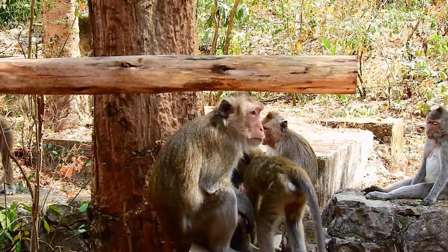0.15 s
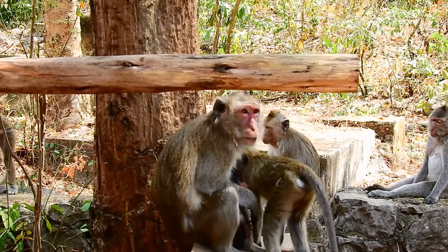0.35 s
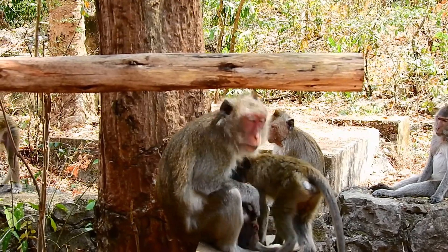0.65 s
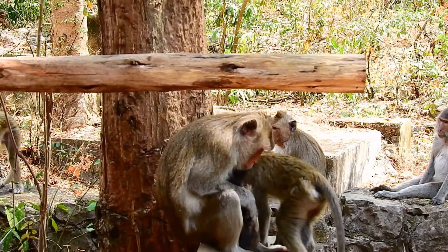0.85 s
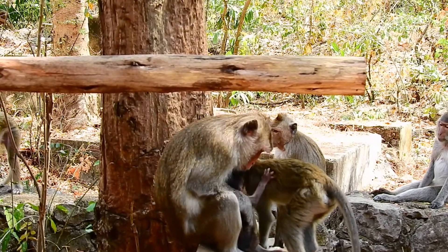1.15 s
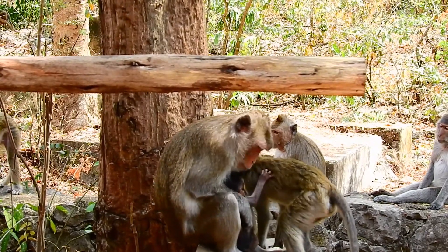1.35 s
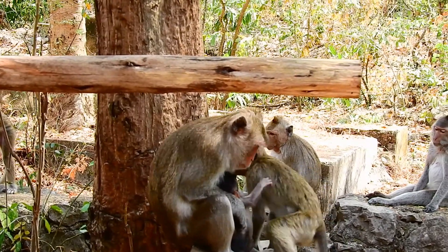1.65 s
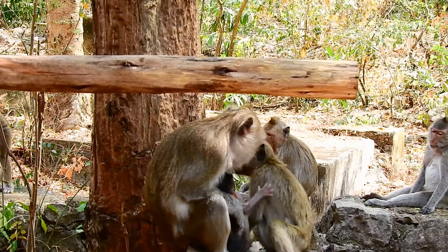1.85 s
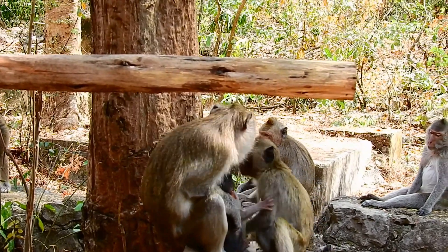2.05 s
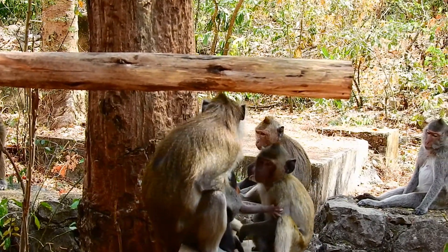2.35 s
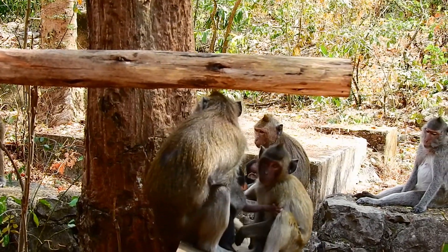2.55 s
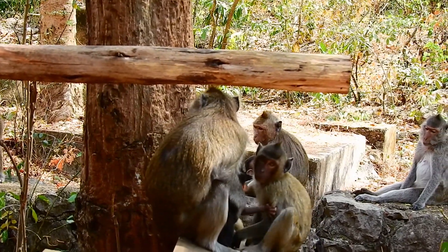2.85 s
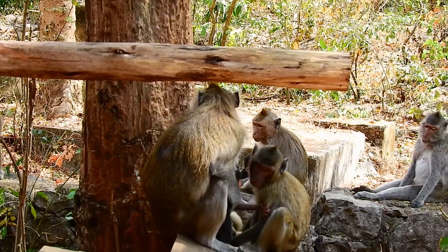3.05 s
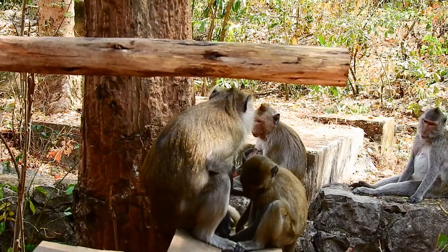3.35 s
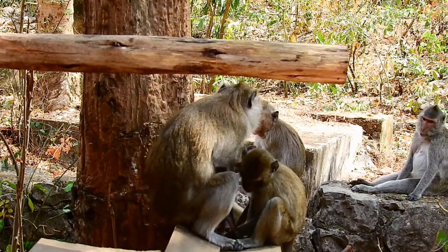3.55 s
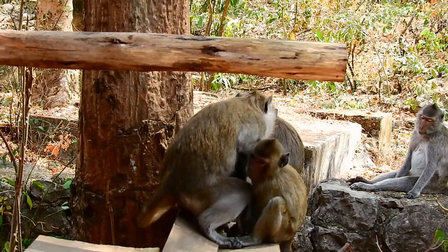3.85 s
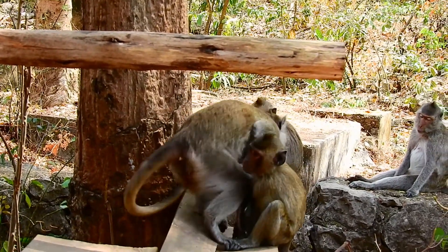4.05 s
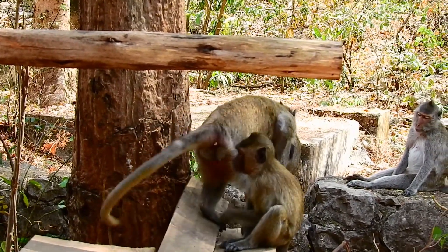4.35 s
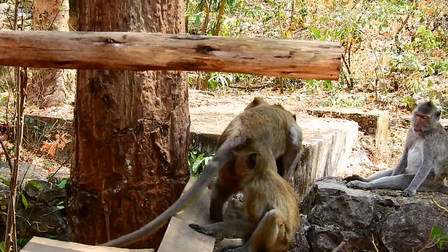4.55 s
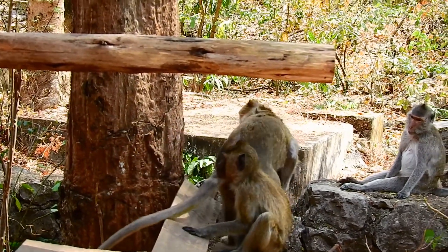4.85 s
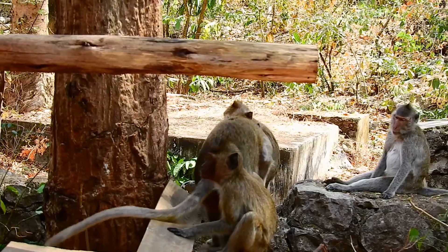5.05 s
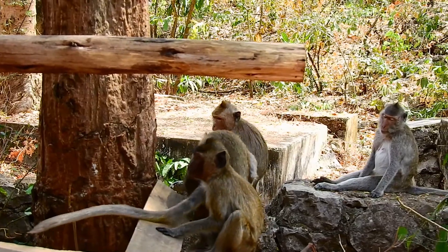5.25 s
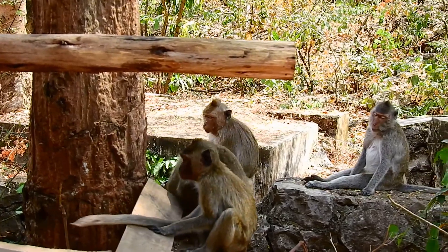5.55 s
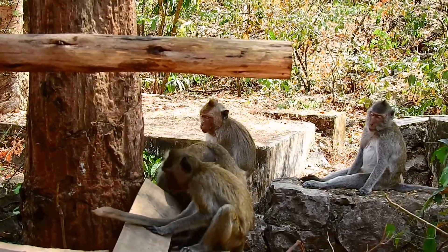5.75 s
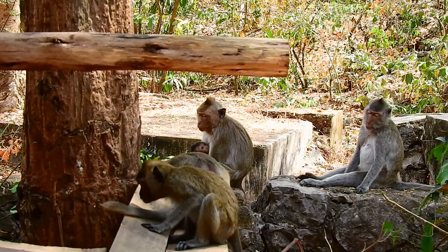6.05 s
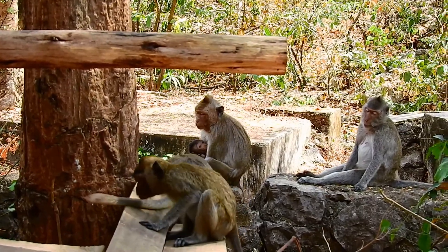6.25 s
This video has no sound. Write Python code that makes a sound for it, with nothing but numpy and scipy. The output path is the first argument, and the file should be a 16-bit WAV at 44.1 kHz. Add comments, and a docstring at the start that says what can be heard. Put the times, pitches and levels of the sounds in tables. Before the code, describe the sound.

Metal knocks and scrapes to the left, a small monkey squeals harshly again and again, then leaves crackle under soft footfalls outdoors.

```python
"""A sheet-metal object to the left is knocked, scraped and squeaks: sums of dying modes, rubbing noise, tones.
Over it and after it a young monkey squeals five times and chirps once among trees: two whistle-like
vibrations in its throat, with overtones and a sum tone, break into rasp made of shaped noise.
Later feet rustle dry leaves (random grains) and thud (short decaying tones).
Behind it all lie a far insect hiss and a low rumble of air, both coloured noise."""
import sys
import numpy as np
from scipy import signal
from scipy.fft import rfft, irfft
from scipy.io import wavfile
from scipy.ndimage import uniform_filter1d

SR = 44100
rng = np.random.default_rng(int(sys.argv[2]) if len(sys.argv) > 2 else 0)


def nominal_scale(level):
    """Amplitude ratio for a level in decibels (scalar or array-like)."""
    x = np.asarray(level, float) / 20
    return 10 ** x


def master_out(mix):
    """Clip the mix to full scale and print it as 16-bit PCM to the path in sys.argv[1]."""
    frames = np.transpose(np.atleast_2d(mix))
    ceiling = np.clip(frames, -1, 1)
    pcm = np.round(ceiling * 32767).astype(np.int16)
    wavfile.write(sys.argv[1], SR, pcm)


N = 281797  # length [samples]


def evened(x):
    """Normalization: scales to rms 1."""
    return x / np.sqrt(np.mean(x ** 2) + 1e-20)


def read(points, hz):
    """Interpolation of a table on a logarithmic frequency axis."""
    table_hz, value = np.transpose(points)
    return np.interp(np.log(hz + 1), np.log(table_hz + 1), value)


def coloured(x, spectrum):
    """Linear filtering: multiplies the sound's spectrum by a table (frequency [Hz], level [dB]); rms 1."""
    gain = nominal_scale(read(spectrum, np.fft.rfftfreq(len(x), 1 / SR)))
    return evened(irfft(rfft(x) * gain, len(x)))


def wobble(length, hz):
    """Low-pass random process of rms 1: noise through two equal poles at hz."""
    pole = np.exp(-2 * np.pi * hz / SR)
    return evened(signal.lfilter([1], np.convolve([1, -pole], [1, -pole]), rng.standard_normal(length)))


def played(rows):
    """Linear interpolation: start sample and the columns of a curve, sample by sample."""
    s, *columns = np.transpose(rows)
    t = np.arange(max(s[0], 0), s[-1], 1 / SR)
    return round(t[0] * SR), [np.interp(t, s, column) for column in columns]


def strokes(rows, rise_s, fall_db_per_s):
    """Exponential decay: strokes rise, hold and die away; their powers add. Start sample and gain."""
    s, hold, db = np.transpose(rows)[:, :, None]
    end = (s + hold).max() + rise_s + 40 / fall_db_per_s
    t = np.arange(max(s.min(), 0), end, 1 / SR)
    rise = np.clip((t - s) / rise_s, 0, 1)
    each = rise * nominal_scale(db - fall_db_per_s * np.maximum(t - s - rise_s - hold, 0))
    return round(t[0] * SR), np.sqrt((each ** 2).sum(0))


def add(mix, start, sound):
    """Superposition: adds a sound from a start sample on."""
    part = mix[..., start:start + sound.shape[-1]]
    part += sound[..., :part.shape[-1]]


def sided(x, side_db):
    """Level difference between the ears: left exceeds right by side_db."""
    return np.array([x * nominal_scale(side_db / 2), x * nominal_scale(-side_db / 2)])


def fold(hz, jitter, flutter_db):
    """Self-sustained vibration, unsteady in pitch and strength: phase [rad] and amplitude."""
    turns = np.cumsum(hz * (1 + jitter * wobble(len(hz), 490))) / SR
    return 2 * np.pi * turns, np.sqrt(2) * nominal_scale(flutter_db * wobble(len(hz), 112))


# throat resonances that band the rasp: (frequency [Hz], width [Hz], lift [dB])
THROAT = [(2850, 74, -1), (3200, 570, 10), (4690, 440, 4.5), (5360, 940, 4), (6040, 230, 4),
          (6900, 99, -44)]


def banded(x):
    """Resonance: the throat lifts or cuts bands of the rasp, and random streaks drift over it."""
    hz, _, z = signal.stft(x, SR, nperseg=512, noverlap=384)
    lift_db = sum(db / (1 + (2 * (hz - centre) / width) ** 2) for centre, width, db in THROAT)
    streaks = rng.standard_normal(z.T.shape).T
    streaks = uniform_filter1d(uniform_filter1d(streaks, 3, axis=0), 16, axis=1)
    z = z * nominal_scale(lift_db[:, None] + 3.5 * evened(streaks))
    return evened(signal.istft(z, nperseg=512, noverlap=384)[1][:len(x)])


# mean pitch of the lower vibration: (time [s], frequency [Hz])
LOWER_PITCH = [(0.259, 2985), (.95, 2750), (1.14, 3186), (1.301, 3126), (1.39, 2927), (1.9, 2850),
               (2.5, 2794), (3.12, 2820), (3.51, 2866), (3.6, 2605), (3.7, 2787), (3.745, 1962),
               (4.31, 2864), (4.66, 2784)]
# strength of an overtone against its fundamental: (frequency [Hz], level [dB])
MOUTH = [(5000, -8), (6800, -5), (7500, -9), (8300, -23), (10000, -30), (11500, -35), (13000, -55)]
# spectrum of the rasp before the throat resonances: (frequency [Hz], level [dB per Hz])
RASP = [(1500, -28.5), (2300, -17.5), (2650, -17.5), (3600, 2), (5000, 5), (6200, 1), (7800, -8),
        (9000, -15), (11000, -23.5), (13000, -65), (15500, -81)]


def squeal(rows):
    """Biphonation: two vibrations and their sum tone share the effort; tearing turns them into lumpy rasp."""
    start, (hz, effort_db, share, torn) = played(rows)
    length = len(hz)
    share, torn = np.clip([share, torn], 0, 1)
    waver = 0.014  # share of the pitch
    hz = hz * (1 + waver * wobble(length, 30))
    low_hz = np.interp((start + np.arange(length)) / SR, *np.transpose(LOWER_PITCH))
    low_hz = low_hz * (1 + waver * wobble(length, 40))
    # jitter is a share of the pitch; tearing adds to it, most where the lower vibration leads
    phase, size = fold(hz, 0.01 + 0.033 * torn ** 2, 2.5 + 1.5 * torn)
    low_phase, low_size = fold(low_hz, 0.008 + 0.03 * share * torn, 2.5 + 2.5 * torn)
    size = size * np.sqrt(1 - share ** 2)
    low_size = low_size * share
    overtones = sum(nominal_scale(read(MOUTH, k * hz)) * np.sin(k * phase) for k in (2, 3))
    upper = size * (np.sin(phase) + overtones)
    lower = low_size * np.sin(low_phase)
    sum_size = nominal_scale(read(MOUTH, hz + low_hz) - 8) * np.sqrt(size * low_size)
    tones = upper + lower + sum_size * np.sin(phase + low_phase)
    lumps = nominal_scale(2.6 * wobble(length, 150))
    rasp = banded(coloured(rng.standard_normal(length) * lumps, RASP))
    voice = nominal_scale(effort_db) * (np.sqrt(1 - torn ** 2) * tones + torn * rasp)
    return start, voice * signal.windows.tukey(length, 0.06)


# five squeals and a chirp, one curve each: (time [s], mean upper pitch [Hz], effort [dB],
# share of the lower vibration [0-1], share torn into rasp [0-1])
SQUEALS = [
    [(.26, 2920, -43, 0.46, 0.55), (.314, 3620, -15, .1, 0.89), (.35, 3845, -16, 0.2, 0.77),
     (.42, 4119, -14, 0, 0.6), (.466, 3946, -14, 0.42, 0.88), (.49, 3780, -42, .2, 0.3)],
    [(.93, 1830, -31, .05, 0), (.954, 2433, -21.5, 0.2, 0.37), (.978, 2956, -16, 0.34, 0.91),
     (1.018, 3827, -19.5, 0.22, 0.93), (1.112, 4150, -20.5, .4, 0.65), (1.146, 3585, -17, 0.82, 0.54),
     (1.23, 3500, -13.5, 0.88, 0.67), (1.326, 3533, -14.5, 0.9, 0.73), (1.385, 3218, -18.5, .97, 0.74),
     (1.41, 3160, -31, 0.9, 0.8)],
    [(1.905, 3116, -38, 0.9, 0.2), (1.93, 3500, -23, .15, 0.74), (1.96, 3650, -18.5, 0.25, 0.92),
     (2.07, 4210, -18.5, 0.4, 0.91), (2.16, 3650, -20.5, 0.55, 0.57), (2.248, 3450, -15, 0.73, 0.89),
     (2.328, 3490, -20, 0.8, .95), (2.386, 3250, -17, 1, 0.51), (2.5, 3210, -24.5, 0.68, 0.86),
     (2.53, 3220, -36, 0.61, 0.8)],
    [(3.09, 3577, -32, .1, 0), (3.115, 3400, -24.5, 0.4, 0.66), (3.2, 4290, -21.5, .1, 0.68),
     (3.266, 3717, -24, 0.06, 0.32), (3.304, 3400, -30.5, 0, 0.1), (3.35, 3240, -30, .02, 0),
     (3.4, 3397, -25, 0.16, 0.46), (3.496, 3730, -17.5, 0.72, 0.89), (3.525, 3600, -17.5, 0.96, 0.75),
     (3.7, 3600, -21.5, 0.99, 0.79), (3.744, 3530, -25.5, 1, 0.78), (3.77, 3600, -41, 0.5, 1)],
    [(4.31, 3606, -39, 0.1, 0.55), (4.37, 3630, -22.5, 0.34, 0.32), (4.39, 3700, -19.5, 0.25, 0.78),
     (4.422, 3816, -23, 0.42, 0.8), (4.504, 3730, -24, 0.31, 0.83), (4.574, 3223, -25, 0.28, 0.78),
     (4.61, 3300, -33, 0, 0.46), (4.66, 3372, -35, 0, 0.72)],
    [(5.083, 2770, -38, 0.3, 0.2), (5.1, 3280, -47, 0, 0.4), (5.125, 2970, -50, .1, 0.8)],
]


def monkey():
    """Superposition of the calls; a level difference places the young one left of the microphone."""
    out = np.zeros(N)
    for rows in SQUEALS:
        add(out, *squeal(rows))
    return sided(out, 4.5)


def mode(hz, db, t60):
    """Damped oscillation: one mode, 60 dB down after t60 seconds."""
    t = np.arange(SR // 2) / SR
    return nominal_scale(db - 60 * t / t60) * np.sin(2 * np.pi * hz * t)


# modes of the metal sheet:
# (frequency [Hz], level when knocked [dB], level when scraped [dB], undamped 60 dB decay time [s])
METAL_MODES = [(339.7, -9, -5, 0.16), (375.3, 1, 0, 0.28), (405, 3, -7, 0.066), (1197, 2.5, -2.5, 0.021),
               (1503, -19, -19, 0.4), (1874, -28, -0.5, 0.37), (2079, -2.5, 4.5, 0.15),
               (2540, -10, -10, 0.16), (2930, -8, -7, 0.12), (3118, -8, -5, 0.27), (3990, -18, -40, 0.11),
               (4430, -31, -34, 0.22), (4700, -26, -32, 0.09), (4910, -29, 7.5, 0.17),
               (5520, -20, -14, 0.2), (5890, -28, 8, 0.13)]


def ringing(drive, high):
    """Modal response: a force convolved with the ring of the modes above 500 Hz, or of those below."""
    ring = sum(mode(hz, db, t60) for hz, db, _, t60 in METAL_MODES if (hz > 500) == high)
    return signal.oaconvolve(drive, ring)[:N]


def rubbed(grit):
    """Contact damping: rubbing cuts the decay times to a third and favours now one mode, now another."""
    out = 0
    for hz, _, db, t60 in METAL_MODES[3:]:
        favour = nominal_scale(3.5 * wobble(len(grit), 12))
        out = out + signal.oaconvolve(grit * favour, mode(hz, db, t60 / 3))
    return out


# knocks on the sheet: (time [s], relative strength [dB], brightness [dB])
KNOCKS = [(0.03, -25, -38), (0.129, -43.5, -2), (0.197, -19, -21), (0.227, -30, -4), (0.294, -22, -12),
          (0.376, -27, -33), (0.436, -18, -19.5), (0.464, -28, -22), (0.498, -40, -32), (0.529, -42, -7),
          (0.596, -19, -23), (0.664, -23.5, -3.5), (0.756, -24.5, -12), (0.819, -21.5, -17.5),
          (0.875, -23, -32), (0.999, -31, -22), (1.078, -24, -35), (1.106, -35, -16.5),
          (1.175, -24.5, -22.5), (1.235, -25, -38), (1.284, -35, -20), (1.401, -36, -16),
          (1.451, -32.5, -16), (2.153, -32, -22)]


def knocks():
    """Impact excitation: a soft push drives the low modes, a short noise burst the high ones."""
    dull, bright = np.zeros((2, N))
    t = np.arange(SR // 50) / SR
    # a soft blow that lasts a few swings
    push = evened(signal.windows.hann(len(t)) * np.sin(2 * np.pi * 370 * t)) * np.exp(-t / 0.0074)
    for s, db, bright_db in KNOCKS:
        burst = rng.standard_normal(len(t)) * np.exp(-t / 0.0013)
        add(dull, round(s * SR) - 150, nominal_scale(db - 46) * push)
        add(bright, round(s * SR), nominal_scale(db + bright_db) * burst)
    return ringing(dull, False) + ringing(bright, True)


# scrapes along the sheet: (start [s], hold [s], relative level [dB])
SCRAPES = [(0, 0.04, -25), (.195, 0.025, -29.5), (.292, .04, -36), (.378, 0.016, -34), (.434, 0.014, -31.5),
           (.592, 0.014, -30), (.655, 0.04, -28), (.752, 0.034, -42), (.82, 0.018, -41.5),
           (.875, 0.0072, -35.5), (.92, 0.044, -35.5), (1.175, 0.25, -43), (1.57, 0.021, -51.5)]
# hiss of the scrape: (frequency [Hz], level [dB per Hz])
SCRAPE_HISS = [(300, -14), (700, -15), (1700, -10), (4800, -1), (6300, -7), (8500, -29), (11000, -44),
               (15000, -66)]


def scrapes():
    """Friction noise: gritty contact rings the damped sheet and hisses."""
    out = np.zeros(N)
    start, level = strokes(SCRAPES, rise_s=0.0027, fall_db_per_s=193)
    grit = rng.standard_normal(len(level)) * nominal_scale(2.55 * wobble(len(level), 110))
    add(out, start, rubbed(nominal_scale(-32) * level * grit))
    add(out, start, nominal_scale(8) * level * coloured(grit, SCRAPE_HISS))
    return out


# squeaks of a sticking joint: (start [s], hold [s], level [dB], second harmonic level [dB])
SQUEAKS = [(0.192, 0.027, -20.5, -30.5), (0.45, 0.015, -27.5, -28.5), (0.59, 0.019, -19.5, -13.5)]


def squeaks():
    """Stick-slip: a sticking metal joint locks to a mode of the sheet, which rings on after it."""
    out = np.zeros(N)
    rise_s, overtone_lag_s = 0.003, 0.015
    for s, hold, db, second_db in SQUEAKS:
        start, level = strokes([(s, hold, db)], rise_s, fall_db_per_s=700)
        # the overtones break in late and linger
        late, second = strokes([(s + overtone_lag_s, hold, second_db)], rise_s, fall_db_per_s=260)
        second = np.pad(second, (late - start, 0))
        level = np.pad(level, (0, len(second)))[:len(second)]
        phase, size = fold(np.full(len(level), 2080.5), jitter=0.009, flutter_db=2.5)
        overtones = np.sin(2 * phase) + nominal_scale(-16) * np.sin(3 * phase)
        add(out, start, size * (level * np.sin(phase) + second * overtones))
    return out + ringing(nominal_scale(-66) * out, True)


def metal():
    """Superposition of knocks, scrapes and squeaks, high-passed at 230 Hz and set to the left."""
    high_pass = signal.butter(3, 230, "high", fs=SR, output="sos")
    return sided(signal.sosfilt(high_pass, knocks() + scrapes() + squeaks()), 4.76)


# feet in dry leaves: (start [s], hold [s], level [dB])
RUSTLES = [(1.72, 0.015, -46), (3.9, 0.026, -32), (3.96, 0.1, -35), (4.07, 0.011, -31.5), (4.12, 0.03, -34),
           (4.158, 0.0036, -23.5), (4.2, 0.071, -32.5), (4.26, 0.052, -27.5), (4.38, .03, -29.5),
           (4.68, 0.13, -41), (4.9, 0.012, -39.5), (5.085, .05, -48), (5.185, 0.035, -53),
           (6.0, 0.12, -46.5), (6.24, .03, -46), (6.36, .03, -41)]
# spectrum of the leaves: (frequency [Hz], level [dB per Hz])
LEAF = [(120, -19), (200, -21), (613, -27), (833, -13), (1260, -16), (1430, -14.5), (1810, -10.5),
        (5550, 7), (8720, -19), (15000, -61)]


def rustles():
    """Shot noise: about 5000 random grains a second, of unequal size, crackle like dry leaves."""
    out = np.zeros((2, N))
    start, level = strokes(RUSTLES, rise_s=0.02, fall_db_per_s=350)
    size = nominal_scale(2.76 * np.minimum(rng.exponential(1, len(level)), 4))
    grains = size * (rng.random(len(level)) < 5000 / SR)
    crackle = coloured(grains * rng.standard_normal(len(level)), LEAF)
    add(out, start, sided(level * crackle, 6.5))
    return out


# soft thuds of feet on wood and stone: (time [s], level [dB], mean pitch [Hz])
THUDS = [(4.158, -25, 1420), (4.252, -27.5, 1590), (4.382, -29.5, 1350), (4.728, -32, 1335),
         (4.909, -32.5, 1150), (5.917, -29.5, 584), (6.25, -33, 760), (6.3, -29, 756)]


def thuds():
    """Damped oscillation: short tones of unsteady pitch, 60 dB down in 31 ms."""
    out = np.zeros((2, N))
    t = np.arange(SR // 10) / SR
    for s, db, hz in THUDS:
        phase, _ = fold(np.full(len(t), hz), jitter=0.16, flutter_db=0)
        envelope = nominal_scale(db - 60 * t / 0.031) * np.minimum(t / 0.0028, 1)
        add(out, round(s * SR), sided(envelope * np.sin(phase), 1.5))
    return out


# phase by which the left microphone port leads: (frequency [Hz], lead [rad])
PORTS = [(0, -1), (3600, 0.56), (5600, 4), (6200, 4.5), (11900, 1)]
# echoes from ground and trunks: (delay [s], left level [dB], right level [dB])
ECHOES = [(.0013, -14, -22.5), (.004, -13, -10.5), (.009, -8.5, -11), (.017, -17, -8), (0.027, -16, -17.5)]
# decay of the scattered tail: (frequency [Hz], 60 dB decay time [s])
TREES = [(400, 0.59), (3000, 0.56), (8000, 0.31)]
# spectrum of the tail, for trunks throw back little bass: (frequency [Hz], level [dB])
SCATTER = [(400, 1), (1500, 6), (4000, 5.5)]


def among_trees(x):
    """Reflection and scattering: direct sound at two ports, near echoes and a decaying tail from the trunks."""
    lead = read(PORTS, np.fft.rfftfreq(2 * N, 1 / SR))
    left = irfft(rfft(x[0], 2 * N) * np.exp(1j * lead))[:N]
    out = np.array([left, x[1]])
    for s, *db in ECHOES:
        add(out, round(s * SR), x * nominal_scale(db)[:, None])
    # one tap of random sign in every 20 samples
    taps = np.zeros((2, SR))
    at = np.arange(500, SR - 20, 20) + rng.integers(0, 20, (2, (SR - 501) // 20))
    np.put_along_axis(taps, at, rng.choice([-1., 1.], at.shape), 1)
    hz, t, z = signal.stft(taps, SR, nperseg=256)
    tail_db = read(SCATTER, hz)[:, None] - 60 * t / read(TREES, hz)[:, None]
    tail = signal.istft(z * nominal_scale(tail_db), SR, nperseg=256)[1]
    scattered = signal.fftconvolve(x, tail / np.linalg.norm(tail[0]), axes=1)[:, :N]
    return nominal_scale(0.5) * out + nominal_scale(-8) * scattered


# spectrum of far insects and air: (frequency [Hz], level [dB per Hz])
WOODS = [(24, -13), (40, -3.5), (101, -1.5), (340, -21), (389, -11), (615, -20.5), (704, -13),
         (1170, -19.5), (1340, -14.5), (3180, -16.5), (4880, -9.5), (6100, -12), (8150, -32),
         (11000, -38.5), (15500, -42)]
# likeness of left and right: (frequency [Hz], correlation [-1 to 1])
SAME = [(40, 0.9), (180, 0.76), (550, 0.75), (1650, 0.77), (4970, 0.4), (15000, -0.67)]
# level of left over right: (frequency [Hz], difference [dB])
LEAN = [(60, 1), (950, 2), (15000, -0.5)]


def woods():
    """Diffuse field: far insects and moving air as partly correlated noise with faint drifting patches."""
    frames, hz = N // 256 + 5, np.fft.rfftfreq(1024, 1 / SR)
    a, b, c, d, patches = rng.standard_normal((frames, 513, 5)).T
    patches = evened(uniform_filter1d(uniform_filter1d(patches, 14, axis=0), 16, axis=1))
    same = np.clip(read(SAME, hz), -1, 1)[:, None]
    left = a + 1j * b
    right = same * left + np.sqrt(1 - same ** 2) * (c + 1j * d)
    gain = nominal_scale(read(WOODS, hz)[:, None] + 1.4 * patches)
    z = np.array([left, right]) * sided(gain, read(LEAN, hz)[:, None])
    return nominal_scale(-42.5) * evened(signal.istft(z, nperseg=1024, noverlap=768)[1][:, :N])


# swells of moving air and shifting bodies: (start [s], hold [s], level [dB])
SWELLS = [(1.45, .15, -58), (2.08, .1, -57), (3.6, .2, -55.5), (3.93, 0.37, -51), (4.36, .05, -46),
          (4.75, 0.21, -60), (5.26, 0.037, -56), (6.2, 0.088, -43.5)]
# spectrum of the rumble: (frequency [Hz], level [dB per Hz])
RUMBLE_TONE = [(24, -41), (40, -12), (119, 2), (196, -7.5), (436, -6.5), (850, -11), (1300, -18),
               (2500, -21), (3250, -50), (5500, -120)]


def rumble():
    """Amplitude-modulated noise: a lumpy low rumble close to the microphone, steady with swells."""
    level = np.full(N, nominal_scale(-57))
    add(level, *strokes(SWELLS, rise_s=0.02, fall_db_per_s=98))
    lumps = level * nominal_scale(3.24 * wobble(N, 22))
    return sided(lumps * coloured(rng.standard_normal(N), RUMBLE_TONE), 2.5)


def scene():
    """Superposition: the near sources sound among the trees, over woods and rumble."""
    near = monkey() + metal() + rustles() + thuds()
    return among_trees(near) + woods() + rumble()


def roll_off(x):
    """The treble ends steeply here."""
    return signal.sosfilt(signal.butter(12, 15690, fs=SR, output="sos"), x)


def record(dry):
    """Saturation: the loudest peaks flatten against the input's limit, spraying treble."""
    ceiling = 0.93  # of full scale
    limited = dry / (1 + abs(dry / ceiling) ** 6) ** (1 / 6)
    return roll_off(limited)


dry = scene()
out = record(dry)
master_out(out)
```